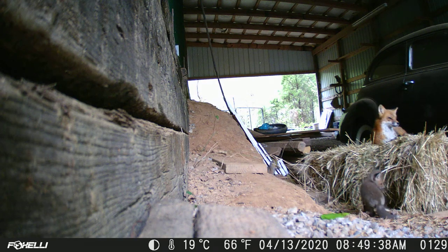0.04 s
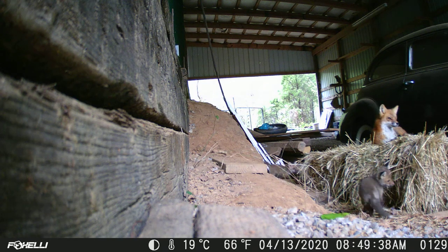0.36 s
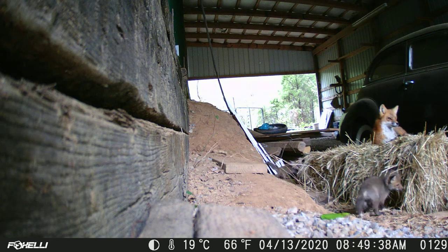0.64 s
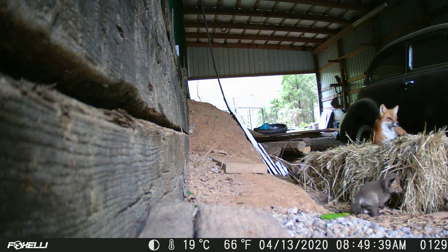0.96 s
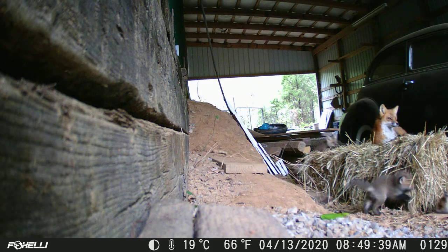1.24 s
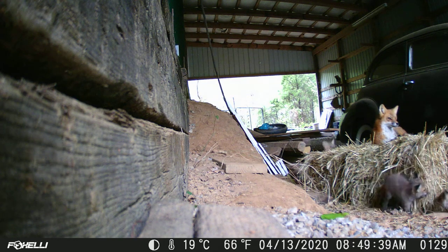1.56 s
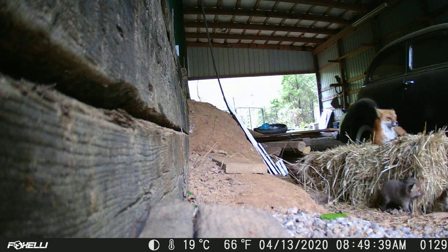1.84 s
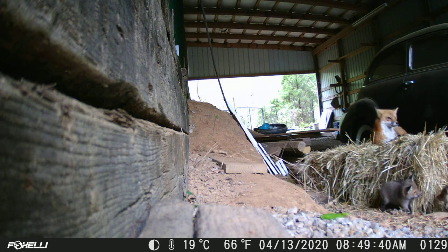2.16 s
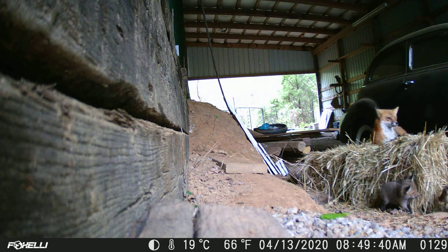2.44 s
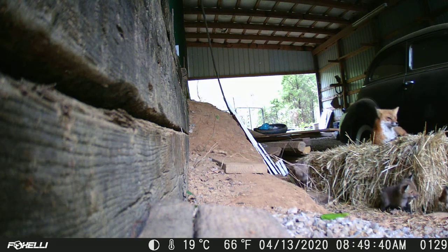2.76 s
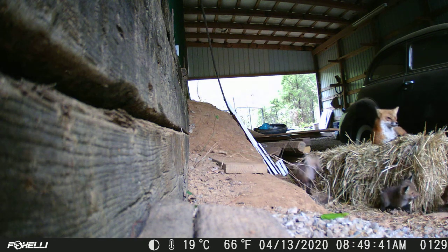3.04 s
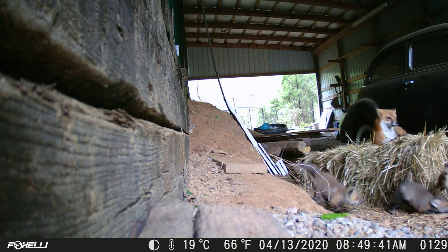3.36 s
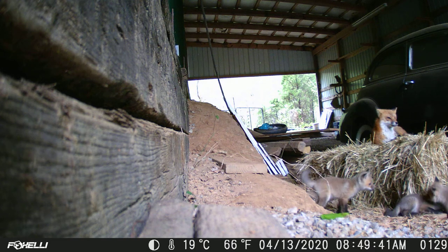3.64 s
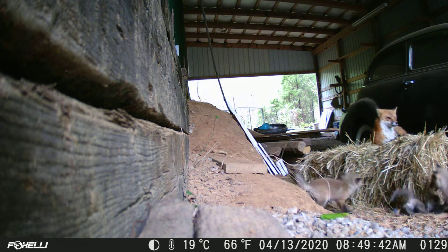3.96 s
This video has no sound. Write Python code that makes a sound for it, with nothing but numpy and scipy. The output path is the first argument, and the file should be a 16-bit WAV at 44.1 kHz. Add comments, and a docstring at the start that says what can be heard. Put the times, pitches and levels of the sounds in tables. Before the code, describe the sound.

Steady low air rumble and hiss, with faint bird calls far away.

```python
"""Distant birds from an open farm shed

Moving air makes a low rumble under a steady hiss. Far outside, one bird yelps about five times a
second, another gives one nasal honk, and a few short, hoarse clucks follow. The calls follow the
source-filter model: yelps and honk are harmonic series with some turbulence, clucks are turbulence
alone. Yard and shed blur them with reverberation, and a small microphone cuts the high treble."""
import sys
import numpy as np
from scipy import signal
from scipy.fft import rfft, irfft
from scipy.io import wavfile
from scipy.ndimage import uniform_filter1d

SR = 44100
rng = np.random.default_rng(int(sys.argv[2]) if len(sys.argv) > 2 else 0)


def generate_wav(sig):
    """Save sig (samples, or channels by samples) to the path in sys.argv[1] as 16-bit PCM at SR."""
    pcm = np.round(np.clip(np.atleast_2d(sig).T, -1, 1) * 32767).astype(np.int16)
    wavfile.write(sys.argv[1], SR, pcm)


N = 176400  # 4 s

# Spectra of the deep rumble, upper rumble and hiss: (frequency [Hz], relative density [dB])
DEEP_SPECTRUM = [(6, -18.5), (14, 3.5), (22, 6), (33, -4.5), (45, -10), (58, -12), (80, -32.5),
                 (200, -74.5)]
UPPER_SPECTRUM = [(30, -23), (58, -5), (69, -0.5), (82, -2.5), (97, -8), (108, -8.5), (119, -9.5),
                  (135, -15.5), (170, -20), (215, -25.5), (300, -33.5), (450, -52), (900, -88.5)]
HISS_SPECTRUM = [(130, -30.5), (280, -2), (400, -2), (560, -3.5), (800, -6.5), (1050, -8), (1400, -9),
                 (1900, -12.5), (2300, -13.5), (2750, -16), (3200, -22), (3700, -21), (4300, -24),
                 (5200, -27), (6300, -24.5), (7300, -21), (7900, -25.5), (8400, -39), (9000, -45)]
# Slow swells of the two rumbles: (time [s], relative level [dB])
DEEP_SWELL = [(0, 2.5), (.8, -1.5), (1.3, 1.5), (1.6, -0.5), (2.2, 0.5), (3.25, -1.5), (3.57, -2.5),
              (4, -0.5)]
UPPER_SWELL = [(0, -0.5), (.9, 1), (1.5, 0), (2.2, 0), (2.85, -.5), (3.22, 3), (3.5, -0.5), (4, -0.5)]
# Puffs of the clucking bird: (centre time [s], level [dB])
CLUCK_PUFFS = [(2.51, -83), (2.68, -79), (2.895, -76), (3.08, -85), (3.3, -80), (3.48, -76.5),
               (3.695, -75.5), (3.88, -84)]
# Throat resonances of a cluck: (frequency [Hz], bandwidth [Hz], relative level [dB])
CLUCK_FORMANTS = [(1740, 380, 0), (2550, 700, -7), (3500, 500, -11)]
# Spectrum of the honk: (harmonic number, relative level at ease [dB], at full strain [dB])
HONK_HARMONICS = [(2, -16, -18), (3, -16, -18), (4, .3, -5), (5, -6, -22), (7, -20, -24), (9, -17.5, -28),
                  (12, -27, -24)]
# Tension of the honking throat: (time [s], strain [0-1])
THROAT_STRAIN = [(2.316, .1), (2.338, .9), (2.364, .9), (2.375, 0), (2.383, .1), (2.395, .9), (2.408, 0),
                 (2.427, .1), (2.437, 1), (2.453, .9)]
# Notes of the yelping bird: (start [s], duration [s], level [dB])
YELP_NOTES = [(.047, .036, -75.5), (.26, .04, -76.5), (.462, .06, -76.8), (.664, .086, -76),
              (.849, .034, -77), (1.047, .06, -77), (1.268, .048, -75.5), (1.46, .07, -76),
              (1.666, .056, -78), (1.843, .038, -77), (2.04, .066, -76.5), (2.265, .04, -79),
              (3.048, .04, -80.5), (3.29, .07, -81), (3.695, .05, -81.5)]
# Spectrum of a yelp: (harmonic number, relative level [dB])
YELP_HARMONICS = [(1, -1.6), (2, -1), (3, -18), (4, -17), (5, -19), (6, -25)]

DEEP_DB, UPPER_DB, HISS_DB, HISS_WAVER_DB = -43.5, -56, -75, 1.05
ECHO_T60_S, ECHO_DB = .4, -13
CLUCK_SIGMA_S = .007
HONK_START_S, HONK_LENGTH_S, HONK_EDGE_S, HONK_DB = 2.31, .141, .008, -73.3
HONK_HZ, STRAIN_RISE, HONK_JITTER = 401, .033, .012  # rise and jitter are fractions of the pitch
HONK_FLUTTER_DB, HONK_RASP_DB = 1.8, -10
WHISTLE_HZ, WHISTLE_DB, WHISTLE_FLUTTER_DB = 2492, -4, 1.5
YELP_HZ, YELP_ARCH, YELP_JITTER = 575, .035, .022  # arch and jitter are fractions of the pitch
YELP_EDGE_S, YELP_FLUTTER_DB, YELP_RASP_DB = .013, 2, -11.5
CATCH_OVER_S, CATCH_SIGMA_S, CATCH_DB = .058, .005, -11  # long yelps dip briefly in the middle
CUTOFF_HZ = 8450


def undb(db):
    """Amplitude ratio of a level in decibels."""
    return 10 ** (np.asarray(db) / 20)


def unit_rms(x):
    """Normalisation to an rms amplitude of 1."""
    return x / np.sqrt(np.mean(x ** 2) + 1e-30)


def waver(rate_hz):
    """Random modulation: held values, smoothed twice, with a spread near 1."""
    hold = int(SR / rate_hz)
    steps = np.repeat(rng.standard_normal(N)[:N // hold + 1], hold)
    return 1.1 * uniform_filter1d(uniform_filter1d(steps, hold), hold)[:N]


def coloured_noise(spectrum):
    """Spectral shaping: white noise weighted by a level curve over log frequency."""
    hz, db = np.array(spectrum).T
    f = np.maximum(np.fft.rfftfreq(N, 1 / SR), 1)
    gain = undb(np.interp(np.log(f), np.log(hz), db))
    return unit_rms(irfft(rfft(rng.standard_normal(N)) * gain, N))


def swell(points):
    """Amplitude envelope, linear in decibels between points."""
    times, db = np.array(points).T
    return undb(np.interp(np.arange(N) / SR, times, db))


def moving_air():
    """Broadband flow noise: two rumbles swell independently beside an almost even hiss."""
    deep = undb(DEEP_DB) * unit_rms(coloured_noise(DEEP_SPECTRUM) * swell(DEEP_SWELL))
    upper = undb(UPPER_DB) * unit_rms(coloured_noise(UPPER_SPECTRUM) * swell(UPPER_SWELL))
    hiss = coloured_noise(HISS_SPECTRUM) * undb(HISS_DB + HISS_WAVER_DB * waver(4.6))
    return deep + upper + hiss


def reverberate(direct):
    """Reverberation: diffuse reflections from yard and shed decay exponentially."""
    t = np.arange(SR) / SR
    tail = rng.standard_normal(SR) * np.exp(-np.log(1000) * t / ECHO_T60_S)
    return direct + undb(ECHO_DB) * signal.fftconvolve(direct, tail / np.linalg.norm(tail))[:N]


def rasp(hz, width_hz):
    """Resonant filtering: the throat passes one steep-sided band of turbulence noise."""
    f = np.fft.rfftfreq(N, 1 / SR)
    return unit_rms(irfft(rfft(rng.standard_normal(N)) / (1 + (2 * (f - hz) / width_hz) ** 4), N))


def trapezoid(t, length, edge_s):
    """Envelope with a linear attack and release."""
    return np.clip(np.minimum(t, length - t) / edge_s, 0, 1)


def voiced_note(start, length, edge_s, hz, bend, harmonics, arch=0):
    """Nearly periodic vibration: harmonics follow one pitch, which `arch` lowers at both ends."""
    t = np.arange(N) / SR - start
    sounding = (t > 0) & (t < length)
    t = t[sounding]
    pitch_hz = hz * (1 - arch * (2 * t / length - 1) ** 2 + bend[sounding])
    phase = 2 * np.pi * np.cumsum(pitch_hz) / SR
    tone = sum(undb(db) * np.sin(round(k) * phase) for k, db in harmonics)
    note = np.zeros(N)
    note[sounding] = np.sqrt(2) * trapezoid(t, length, edge_s) * tone
    return note


def clucks():
    """Noise-excited formants: Gaussian puffs of turbulence through three throat resonances."""
    t = np.arange(N) / SR
    breath = sum(undb(db) * rasp(hz, width) for hz, width, db in CLUCK_FORMANTS)
    puffs = sum(undb(db) * np.exp(-.5 * ((t - at) / CLUCK_SIGMA_S) ** 2) for at, db in CLUCK_PUFFS)
    return breath * puffs


def honk():
    """Biphonation: strain lifts the pitch of a nasal voice, which gives way to a thin whistle."""
    t = np.arange(N) / SR
    timing = HONK_START_S, HONK_LENGTH_S, HONK_EDGE_S
    strain = np.interp(t, *np.array(THROAT_STRAIN).T)
    jitter = HONK_JITTER * waver(450)
    bend = STRAIN_RISE * strain + jitter
    numbers, relaxed_db, strained_db = np.array(HONK_HARMONICS).T
    relaxed = voiced_note(*timing, HONK_HZ, bend, zip(numbers, relaxed_db))
    strained = voiced_note(*timing, HONK_HZ, bend, zip(numbers, strained_db))
    voice = ((1 - strain) * relaxed + strain * strained) * undb(HONK_FLUTTER_DB * waver(180))
    whistle = voiced_note(*timing, WHISTLE_HZ, jitter / 2, [(1, WHISTLE_DB)])
    whistle *= strain * undb(WHISTLE_FLUTTER_DB * waver(140))
    envelope = trapezoid(t - HONK_START_S, HONK_LENGTH_S, HONK_EDGE_S)
    breath = undb(HONK_RASP_DB) * envelope * rasp(hz=1600, width_hz=800)
    return undb(HONK_DB) * (voice + whistle + breath)


def yelps():
    """Frequency and amplitude modulation: hollow, slightly raspy notes quaver; long ones break in two."""
    t = np.arange(N) / SR
    jitter = YELP_JITTER * waver(200)
    breath = undb(YELP_RASP_DB) * rasp(hz=2080, width_hz=3100)
    notes = np.zeros(N)
    for start, length, db in YELP_NOTES:
        voice = voiced_note(start, length, YELP_EDGE_S, YELP_HZ, jitter, YELP_HARMONICS, YELP_ARCH)
        effort = np.sin(np.pi * np.clip((t - start) / length, 0, 1))
        midpoint_pulse = np.exp(-.5 * ((t - start - length / 2) / CATCH_SIGMA_S) ** 2)
        catch_db = CATCH_DB * (length > CATCH_OVER_S) * midpoint_pulse
        notes += undb(db + catch_db) * (voice + effort * breath)
    return notes * undb(YELP_FLUTTER_DB * waver(130))


def scene():
    """Superposition: air noise and the reverberant bird calls add in one channel."""
    return (moving_air() + reverberate(yelps() + honk() + clucks()))[None]


def record(dry):
    """Band limiting: the small microphone acts as a steep low-pass filter."""
    lowpass = signal.ellip(N=8, rp=.2, rs=70, Wn=CUTOFF_HZ, fs=SR, output="sos")
    return signal.sosfilt(lowpass, dry)


dry = scene()
out = record(dry)
generate_wav(out)
```